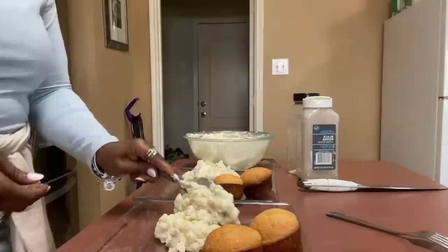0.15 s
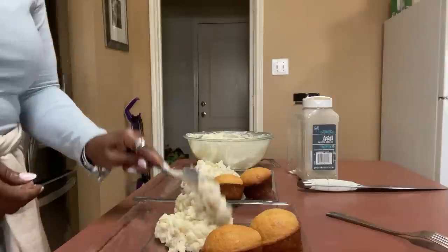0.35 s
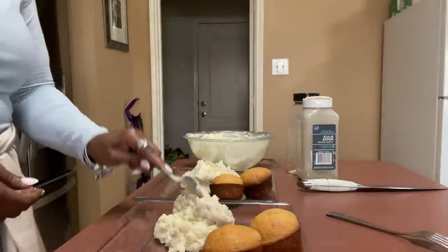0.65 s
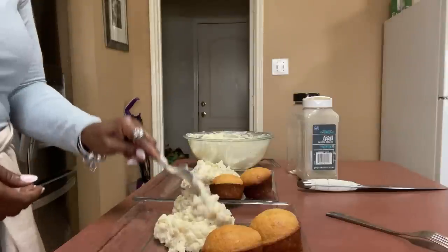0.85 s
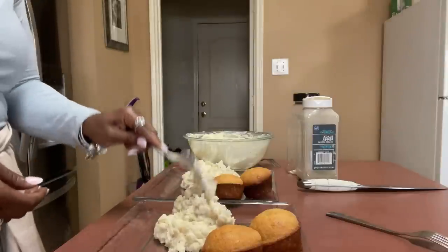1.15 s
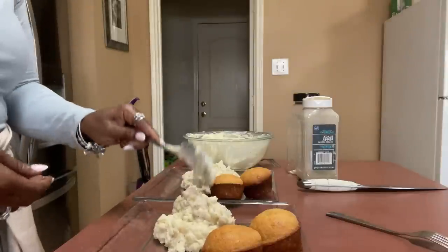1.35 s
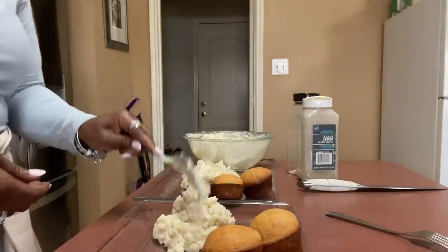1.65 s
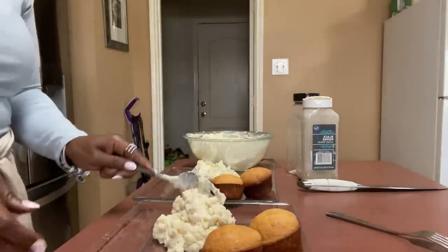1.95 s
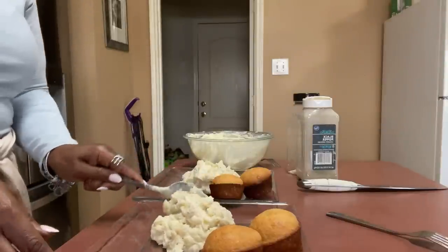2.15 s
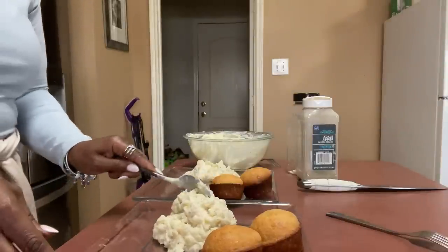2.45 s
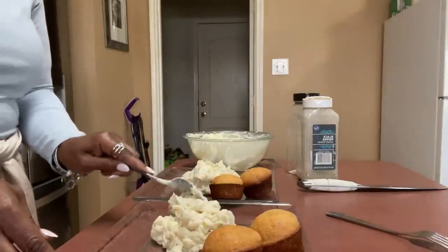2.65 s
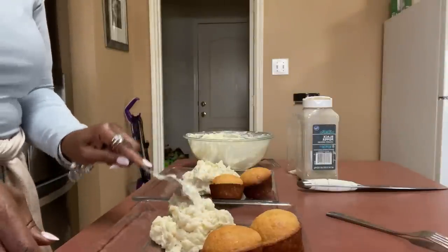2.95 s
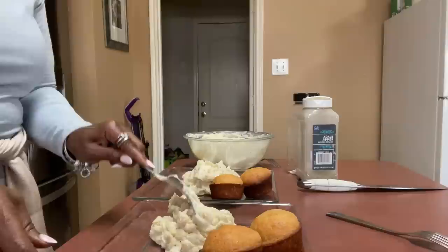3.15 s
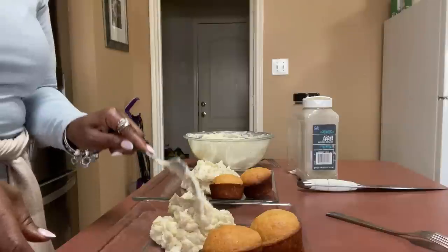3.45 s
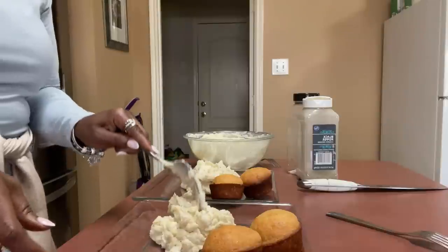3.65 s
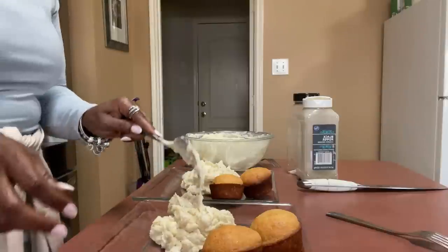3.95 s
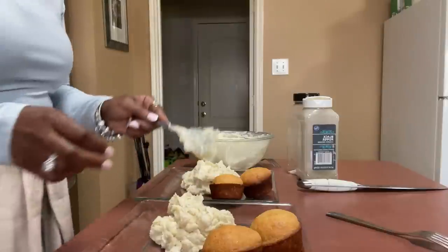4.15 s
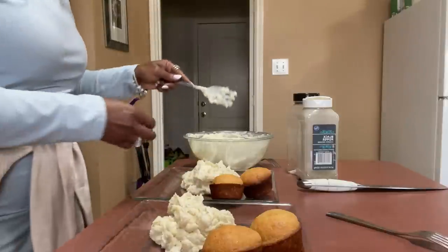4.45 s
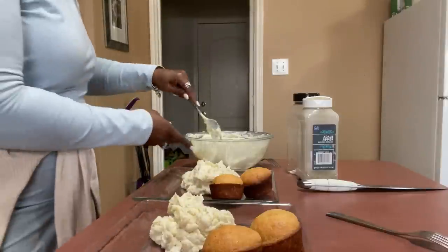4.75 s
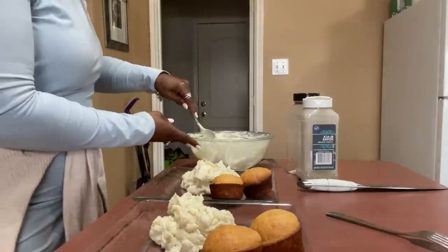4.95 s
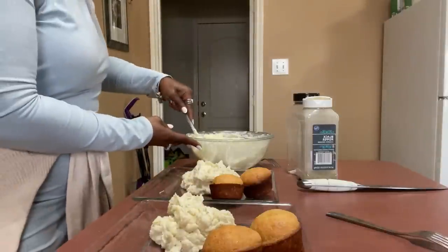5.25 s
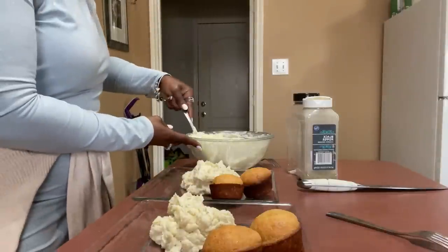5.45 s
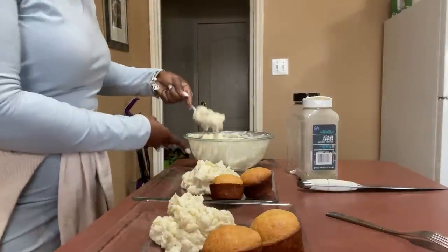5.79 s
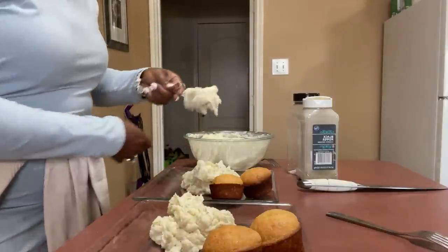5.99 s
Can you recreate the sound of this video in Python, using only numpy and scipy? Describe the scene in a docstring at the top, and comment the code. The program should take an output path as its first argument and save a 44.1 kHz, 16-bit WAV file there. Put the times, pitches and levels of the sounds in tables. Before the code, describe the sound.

Close on a kitchen table, a metal spoon pushes and peels sticky mash in quick, crackling, wet bursts with small smacks, while bracelet charms tinkle very high. Two soft scuffs pass around the two-second mark. After a quieter pause the spoon digs into a filled glass bowl: a knock, a bright damped clink, duller taps and low table thuds, then a last sticky squish. A fridge hums steadily beneath in a small live room.

```python
"""A small, live kitchen: mashed potato is worked off a metal spoon onto a plate, then the spoon digs into a glass bowl.
The mash crackles in dense showers of pops, smacks as air pockets snap, and slurps in short swells of friction.
The spoon clinks with decaying glass modes and knocks dully; the table thuds in short low sine bursts.
Bracelet charms tinkle as paired high rings, something scuffs twice with rough, dense slips.
A motor, likely the fridge, hums and whines in wavering sines over a rush of coloured noise."""
import sys
import numpy as np
from scipy import signal
from scipy.fft import rfft, irfft
from scipy.io import wavfile
from scipy.ndimage import uniform_filter1d

SR = 44100
rng = np.random.default_rng(int(sys.argv[2]) if len(sys.argv) > 2 else 0)


def bounce(signal):
    """Save signal as a 16-bit WAV file at the path given by the first command-line argument."""
    frames = np.transpose(np.atleast_2d(signal))
    limited = np.clip(frames, -1, 1)
    pcm = np.round(limited * 32767).astype(np.int16)
    wavfile.write(sys.argv[1], SR, pcm)


N = 269892
T = np.arange(N) / SR


def undb(db):
    """Decibels to gain."""
    return 10 ** (np.asarray(db) / 20)


def unit(x):
    """Scale to rms 1."""
    return x / np.sqrt(np.mean(x ** 2))


def at_hz(points, hz):
    """Read (frequency, value) points on a log-frequency axis."""
    f, value = np.transpose(points)
    return np.interp(np.log(np.maximum(hz, 1)), np.log(f), value)


def colour(x, points):
    """Give a steady sound a spectrum."""
    freqs = np.fft.rfftfreq(x.shape[-1], 1 / SR)
    return irfft(rfft(x) * undb(at_hz(points, freqs)), x.shape[-1])


def impulse(points, size=1024):
    """The causal click with this spectral shape, peak 1."""
    freqs = np.fft.rfftfreq(size, 1 / SR)
    cepstrum = irfft(np.log(undb(at_hz(points, freqs))))
    # folding the cepstrum forward gives minimum phase: the energy comes at once
    cepstrum[1:size // 2] *= 2
    cepstrum[size // 2 + 1:] = 0
    click = irfft(np.exp(rfft(cepstrum)))
    return click / np.abs(click).max()


def fade(t, t60):
    """Exponential decay, 60 dB down after t60 seconds."""
    return np.exp(-np.log(1000) * t / t60)


def stroke(attack_s, hold_s, release_t60):
    """Envelope of one movement: it swells, holds and dies away."""
    t = T[:SR // 2]
    swell = np.minimum(t / max(attack_s, 1 / SR), 1)
    return swell * fade(np.maximum(t - attack_s - hold_s, 0), release_t60)


def soften(x, cut_hz):
    """A padded contact loses its treble."""
    lowpass = signal.butter(2, min(cut_hz, SR * .45), fs=SR, output="sos")
    return signal.sosfilt(lowpass, x)


def walk(rate):
    """Slow chance with a spread near 1, drawn anew about rate times a second and smoothed."""
    k = int(SR / rate)
    steps = np.repeat(rng.standard_normal(N // k + 1), k)
    return unit(uniform_filter1d(uniform_filter1d(steps, k), k)[:N])


def rub(points, per_second, grip_db):
    """Dense slips whose grip comes and goes, rms 1."""
    happens = rng.random(N) < per_second / SR
    slips = rng.standard_normal(N) * happens * undb(grip_db * walk(90))
    return unit(signal.fftconvolve(slips, impulse(points))[:N])


def add(track, s, sound):
    """Mix a sound in at time s."""
    i = max(int(s * SR), 0)
    track[i:i + len(sound)] += sound[:N - i]


# reverberation of the kitchen: (frequency [Hz], t60 [s])
ROOM_T60 = [(100, 0.62), (800, 0.5), (2000, 0.43), (5500, 0.49), (10000, 0.25), (16000, 0.29)]


def kitchen(x, wet_db, pan_db=0, gap_s=0.0012):
    """Direct sound, panned left for positive pan_db, plus a diffuse tail, different at each ear."""
    t = T[:SR * 3 // 4]
    freqs = np.fft.rfftfreq(len(t), 1 / SR)
    noise, tail = rfft(rng.standard_normal((2, len(t)))), 0
    # overlapping bands of noise, each dying at its own pace
    for share, (_, t60) in zip(np.eye(len(ROOM_T60)), ROOM_T60):
        band = at_hz(np.c_[np.array(ROOM_T60)[:, 0], share], freqs)
        tail = tail + irfft(noise * band, len(t)) * fade(t, t60)
    # the tail fades in around gap_s after the direct sound
    tail = tail * np.clip(t / gap_s - .5, 0, 1)
    tail /= np.sqrt(np.sum(tail ** 2) / 2)
    direct = x * undb(np.array([[pan_db], [-pan_db]]) / 2)
    return direct + undb(wet_db) * signal.fftconvolve(x[None], tail, axes=1)[:, :N]


# the spoon presses the mash or peels away from it: (start [s], crackle level [dB], length [s])
PRESSES = [(0.0, -54.5, 0.062), (0.24, -58.5, .05), (0.315, -55.5, 0.044), (0.404, -55.5, .05),
           (0.474, -54, 0.058), (0.603, -60, 0.022), (0.69, -56, .04), (0.735, -51, 0.039),
           (0.9, -54, 0.031), (0.995, -54, 0.041), (1.163, -68, 0.11), (1.298, -56, 0.039),
           (1.496, -56.5, 0.034), (1.634, -58, .02), (1.786, -60, 0.039), (2.123, -55.5, 0.05),
           (2.295, -58, 0.067), (2.598, -59, 0.043), (2.73, -65, .15), (3.014, -54.5, 0.04),
           (3.144, -57, 0.04), (3.326, -65, 0.05), (3.451, -52, 0.024), (3.695, -50.5, 0.016),
           (3.945, -78, 0.025), (4.472, -54.5, 0.031), (5.107, -51.5, 0.058), (5.373, -60, 0.14),
           (5.639, -65.5, 0.1), (6.077, -52.5, .04)]
# timbre of the tiny pops: (frequency [Hz], relative level [dB])
SQUISH_COLOUR = [(400, -18), (1000, -10), (2200, -5.5), (4000, -1.5), (7000, 4.5), (10500, 3.5), (12500, 4),
                 (15000, 3.5), (17000, -27)]


def squish(level_db=-4, rest_db=-73, per_second=1100, spread_db=6.0, largest_db=23):
    """Countless tiny pops as the mash is pressed and peels off the spoon; they go on faintly between presses."""
    attack_s, release_t60 = 0.0044, 0.064
    effort = np.full(N, undb(rest_db))
    for s, db, length in PRESSES:
        add(effort, s, undb(db) * stroke(attack_s, length - attack_s, release_t60))
    pop_db = np.minimum(spread_db * rng.exponential(size=N), largest_db)
    sizes = undb(pop_db) * rng.choice([-1, 1], N)
    pops = sizes * (rng.random(N) < per_second / SR)
    crackle = unit(signal.fftconvolve(pops, impulse(SQUISH_COLOUR))[:N])
    return kitchen(crackle * effort * undb(level_db), wet_db=1.0)


# sticky smacks of the mash: (time [s], relative level [dB])
SMACKS = [(0.056, -34), (0.2083, -40), (0.2647, -34.5), (0.3175, -31.5), (0.4242, -28), (0.536, -30.5),
          (0.5994, -31.5), (0.6455, -31.5), (0.6736, -29), (0.7378, -35), (0.8406, -33.5), (0.8963, -35),
          (0.9946, -37.5), (1.126, -42), (1.3096, -36), (1.5664, -34), (2.2885, -41), (2.619, -31.5),
          (2.7389, -37.5), (3.056, -31.5), (3.448, -28), (3.6905, -37), (4.0696, -42.5), (4.487, -43),
          (5.1485, -34), (5.6675, -37.5), (5.908, -48.5), (6.081, -39), (6.096, -31)]
# timbre of a snap, also of a charm's tick: (frequency [Hz], relative level [dB])
SMACK_COLOUR = [(500, -21), (2500, -20), (4500, -21), (7000, 9), (10500, 6.5), (15000, 1.5), (17000, -2.5)]


def smacks(level_db=3, tear_db=-17, tear_t60=0.011):
    """An air pocket snaps open, each with its own colour, and the film around it tears."""
    out, t = np.zeros(N), T[:SR // 30]
    scatter_db = 2
    for s, db in SMACKS:
        snap = undb(tear_db) * rng.standard_normal(len(t)) * fade(t, tear_t60)
        snap[0] = 1
        pocket = impulse([(hz, d + scatter_db * rng.standard_normal()) for hz, d in SMACK_COLOUR])
        sound = signal.fftconvolve(snap, pocket)
        add(out, s, undb(db + level_db) * sound / np.abs(sound).max())
    return kitchen(out, wet_db=-6)


# the spoon slides wetly out of the mash: (start [s], level [dB], length [s])
SLURPS = [(0.48, -67, 0.069), (0.713, -50.5, 0.059), (3.018, -68, 0.059), (3.45, -60, 0.067)]
# timbre of the wet friction: (frequency [Hz], relative level [dB])
SLURP_COLOUR = [(400, -7), (1050, 1.5), (1700, -15), (2400, -12), (4500, -4), (7000, -18), (16000, -33)]


def slurps():
    """Short swells of wet friction, made of dense slips."""
    swell = np.zeros(N)
    for s, db, length in SLURPS:
        add(swell, s, undb(db) * np.hanning(int(length * SR)))
    friction = rub(SLURP_COLOUR, per_second=1800, grip_db=7.5)
    return kitchen(swell * friction, wet_db=-15)


# spoon against the glass of plate or bowl: (time [s], level [dB], contact cut-off [Hz])
CLINKS = [(2.1150, -31.5, 3500), (3.393, -40.5, 9000), (5.3407, -12, 9400), (5.4718, -31.5, 6940),
          (5.5806, -29.5, 1800), (5.6393, -21, 2460)]
# modes of the filled glass bowl: (frequency [Hz], relative level [dB], t60 before damping [s])
BOWL = [(1148, -7, 0.23), (1284, -12, 0.39), (1240, -8, 0.18), (1520, -16, 0.39), (1660, -2.5, 0.37),
        (1750, 4, 0.25), (1880, -12, 0.27), (2463, -3, 0.31), (2734, 2, 0.11), (2880, -14, 0.2),
        (3410, -26, 0.16), (3570, 2, 0.23), (3600, -9, .15), (3930, 12, .12), (4180, -3, .26),
        (4100, -25, 0.18), (5600, -1, .3), (5430, 3, 0.14), (7350, -25, .15), (9600, -27, .15)]
# timbre of metal touching glass: (frequency [Hz], relative level [dB])
CONTACT_COLOUR = [(200, -26), (450, -5), (650, -15), (950, -6), (1600, 1.5), (1900, -4), (2250, -13),
                  (2660, -0.5), (3150, -10.5), (4000, 1), (4700, -18.5), (5650, -18), (7000, -18.5),
                  (10000, -18), (16000, -34)]


def clinks(ring_db=-32, contact_db=0, damping=3.3, chatter_db=-15, chatter_t60=0.011):
    """Metal cracks and chatters on glass, then the bowl's modes ring, damped by the mash; padded blows are duller."""
    out, t = np.zeros(N), T[:SR // 2]
    for s, db, cut_hz in CLINKS:
        push = undb(chatter_db) * rng.standard_normal(len(t)) * fade(t, chatter_t60)
        push[0] = 1
        crack = signal.fftconvolve(push, impulse(CONTACT_COLOUR))[:len(t)]
        ring = np.zeros(len(t))
        for k, (hz, mode_db, t60) in enumerate(BOWL):
            sign = (-1) ** k  # neighbouring modes start in opposite directions
            ring += undb(mode_db) * sign * np.sin(2 * np.pi * hz * t) * fade(t, t60 / damping)
        blow = undb(contact_db) * crack + undb(ring_db) * ring
        add(out, s, undb(db) * soften(blow, cut_hz))
    return kitchen(out, wet_db=3.5, pan_db=4, gap_s=0.0056)


# spoon bottoming out through the mash: (time [s], level before softening [dB], contact cut-off [Hz])
KNOCKS = [(5.1167, -16, 12000), (5.1204, -42, 1300), (5.1251, -26.5, 5000), (5.1521, -38, 9000),
          (5.333, -27.5, 1200), (5.5804, -24.5, 1600)]
# timbre of the dull knock: (frequency [Hz], relative level [dB])
KNOCK_COLOUR = [(80, -3), (200, 6.5), (330, 9.5), (580, -6.5), (780, 9), (1050, -3.5), (1500, -22.5),
                (2200, -19), (3100, -7.5), (4200, -20), (5500, -16), (9000, -38), (16000, -38)]


def knocks():
    """The spoon drives through the mash and knocks dully on the bowl's bottom, each click softened by its contact."""
    out = np.zeros(N)
    for s, db, cut_hz in KNOCKS:
        add(out, s, undb(db) * soften(impulse(KNOCK_COLOUR), cut_hz))
    return kitchen(out, wet_db=0, pan_db=-4.5)


# the table top thudding under the bowl: (time [s], level [dB], frequency [Hz], length [s])
THUDS = [(4.845, -30, 86, 0.038), (5.113, -20.5, 143, 0.034), (5.17, -23.5, 137, 0.043),
         (5.244, -25, 89.3, 0.064), (5.3, -24, 86, 0.056), (5.59, -15.5, 83, 0.039),
         (5.582, -30, 180, 0.035), (5.755, -29, 82, 0.031)]


def thuds():
    """Soft pushes on the bowl flex the table top for a few cycles."""
    out = np.zeros(N)
    for s, db, hz, length in THUDS:
        t = T[:int(length * SR)]
        push = np.sin(np.pi * t / length)
        add(out, s, undb(db) * push * np.sin(2 * np.pi * hz * t))
    return kitchen(out, wet_db=-22.5)


# the bracelet swings, one charm strikes and rebounds on its neighbour:
# (time [s], level [dB], rebound delay [s], rebound relative to strike [dB])
CHARMS = [(0.2083, -39, 0.022, -2), (0.4005, -31, .024, -10), (0.9218, -30, 0.023, -11),
          (1.1441, -35, 0.034, -3.5), (1.465, -46, 0.026, -6), (1.499, -31.5, 0.064, -1.5),
          (1.7593, -31.5, 0.036, -6.5), (2.049, -36.5, .042, 0.5), (2.4603, -47.5, 0.035, -1),
          (2.819, -41.5, .0339, -5), (3.018, -46, .035, -8), (3.152, -53, 0.031, 7),
          (3.3069, -47, .0279, 2), (3.497, -46.5, .049, -2), (3.703, -36, .0227, -3),
          (3.943, -39, 0.039, -1.5), (4.0806, -47, 0.026, -14), (4.2328, -44.5, 0.061, 3.5),
          (4.4378, -48.5, .03, -4), (4.8748, -52, .03, -10), (5.2684, -47, .03, -9)]


def bracelet(ring_db=-1, ring_t60=0.039, tick_db=0, detune_hz=110):
    """A tiny charm ticks and rings, then falls back on its neighbour, tuned slightly higher on average."""
    charm_hz, neighbour_hz = 13850, 14000
    out, t = np.zeros(N), T[:SR // 4]
    tick = impulse(SMACK_COLOUR)
    for s, db, gap_s, rebound_db in CHARMS:
        strike = (s, db, charm_hz)
        rebound = (s + gap_s, db + rebound_db, neighbour_hz)
        for when, touch_db, hz in (strike, rebound):
            ring = np.sin(2 * np.pi * (hz + detune_hz * rng.standard_normal()) * t)
            add(out, when, undb(touch_db + ring_db) * ring * fade(t, ring_t60))
            add(out, when, undb(touch_db + tick_db) * tick)
    return kitchen(out, wet_db=-2)


# two short scuffs: (start [s], relative level [dB], swell [s], hold [s])
SCUFFS = [(2.11, -34.5, 0.036, 0.049), (2.32, -36, .10, 0.024)]
# the sole catches on grit: (time [s], relative level [dB])
CATCHES = [(2.133, -39.5), (2.415, -48.5)]
# timbre of the rubbing: (frequency [Hz], relative level [dB])
SCUFF_COLOUR = [(150, -24), (250, 5), (335, 3.5), (480, 3), (600, -11), (800, -1), (1250, -0.5), (1550, -6),
                (1850, -7), (2300, -11), (3000, -24), (4000, -29), (6000, -30), (10000, -45), (16000, -64)]
# timbre of the grit: (frequency [Hz], relative level [dB])
GRIT_COLOUR = [(1000, -22), (3200, 4), (4300, 3.5), (5400, -8), (7000, -6), (10000, -19), (16000, -42)]


def scuffs(level_db=-3, grit_db=-21):
    """Dry rubbing in dense slips, likely a slipper on the floor; it is gritty where it catches."""
    slide, bite = np.zeros((2, N))
    for s, db, swell_s, hold_s in SCUFFS:
        add(slide, s, undb(db) * stroke(swell_s, hold_s, release_t60=0.1))
    for s, db in CATCHES:
        add(bite, s, undb(db) * stroke(attack_s=0.0035, hold_s=0.0061, release_t60=0.1))
    body = rub(SCUFF_COLOUR, per_second=1200, grip_db=2.0) * slide
    grit = rub(GRIT_COLOUR, per_second=4000, grip_db=4.0) * (bite + undb(grit_db) * slide)
    return kitchen(undb(level_db) * (body + grit), wet_db=-4.5)


# fridge motor and fan tones: (frequency [Hz], rms level before waver [dB])
HUM = [(56.5, -52), (103.5, -82), (117.7, -44.5), (120.0, -31.5), (136.3, -39.5), (240.0, -61),
       (256.3, -67)]
# compressor whine: (frequency [Hz], rms level before waver [dB])
WHINE = [(829.0, -71.5), (1007, -70.5), (1066, -76.5), (1362, -85), (1421, -78.5), (1599, -75.5),
         (1717, -82), (2132, -86.5), (3612, -80.5), (3908, -80.5), (4500, -85.5), (5744, -82), (5803, -85),
         (6632, -100)]


def fridge(whine_db=0, whine_waver_db=4.0):
    """Low tones beat against each other; the thin whine wavers and reaches each ear by its own path."""
    hum_waver_db = .5
    hum = whine = 0
    for hz, db in HUM:
        phase = rng.uniform(0, 2 * np.pi)
        hum = hum + undb(db + hum_waver_db * walk(5.07)) * np.sin(2 * np.pi * hz * T + phase)
    for hz, db in WHINE:
        level = undb(db + whine_db + whine_waver_db * walk(11))
        ear_phases = rng.uniform(0, np.pi, (2, 1))
        drift = .5 * walk(9.2)  # radians
        whine = whine + level * np.sin(2 * np.pi * hz * T + drift + ear_phases)
    return 2 ** .5 * (hum + whine)  # peak of a sine from its rms


# room air: (frequency [Hz], relative level [dB])
AIR = [(20, -17), (40, -13), (60, -2), (105, -3.5), (138, 2.5), (200, -8), (400, -20.5), (560, -28.5),
       (900, -28), (2500, -48.5), (3900, -39), (5000, -47.5), (11000, -56), (15500, -59), (17000, -79)]
# stereo spread of the air: (frequency [Hz], side minus mid [dB])
AIR_SIDE = [(30, 1), (120, -11.5), (250, -5), (500, 1.5), (2000, 0), (12000, 5.5)]


def air(level_db=-41.0):
    """Steady rush of fan and room as coloured noise, most alike at both ears in the upper bass."""
    mid, side = colour(rng.standard_normal((2, N)), AIR)
    side = colour(side, AIR_SIDE)
    return undb(level_db) * np.array([mid + side, mid - side]) / mid.std()


def scene():
    """Everything heard from the table top."""
    mash = squish() + smacks() + slurps()
    spoon_and_bowl = clinks() + knocks() + thuds()
    return mash + spoon_and_bowl + bracelet() + scuffs() + fridge() + air()


# stereo width of the pickup: (frequency [Hz], share of the side signal kept [0..1])
WIDTH = [(7500, 1), (9500, .4), (16000, .3)]


def record(dry):
    """The stereo pickup narrows in the treble, where the right lags slightly; a steep low-pass cuts the top."""
    split_hz, lag_s, top_hz = 5550, .00021, 16300
    hz = np.fft.rfftfreq(N, 1 / SR)
    left, right = rfft(dry)
    mid = (left + right) / 2
    side = (left - right) / 2 * at_hz(WIDTH, hz)
    late = np.exp(-2j * np.pi * lag_s * np.maximum(hz - split_hz, 0))  # delays only above split_hz
    ears = irfft([mid + side, (mid - side) * late], N)
    lowpass = signal.ellip(8, .2, 80, top_hz, fs=SR, output="sos")
    return signal.sosfilt(lowpass, ears)


dry = scene()
out = record(dry)
bounce(out)
```